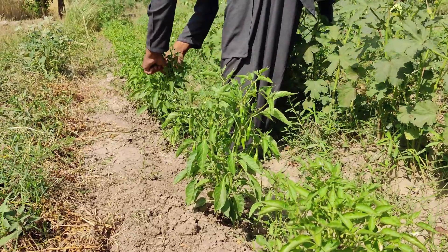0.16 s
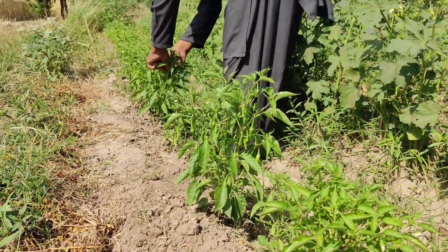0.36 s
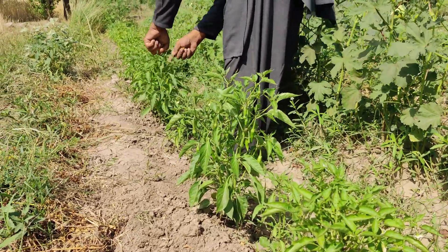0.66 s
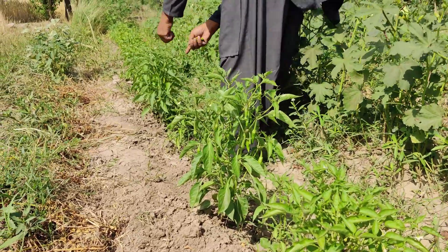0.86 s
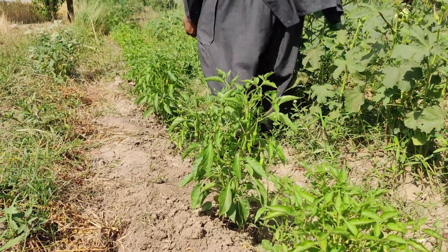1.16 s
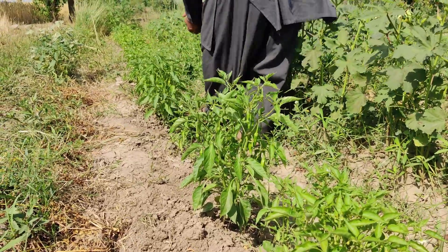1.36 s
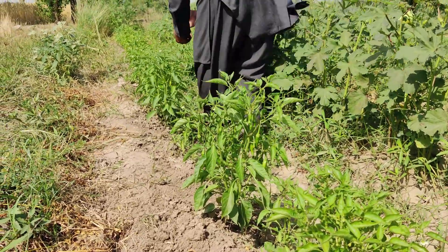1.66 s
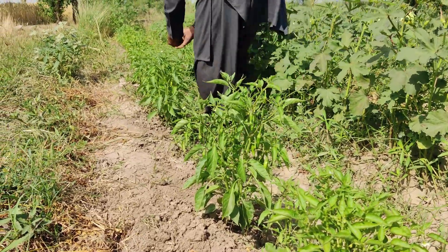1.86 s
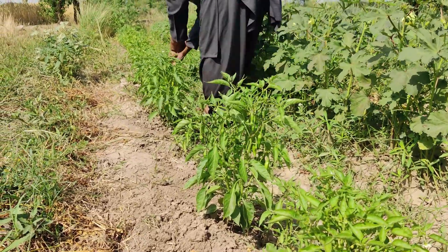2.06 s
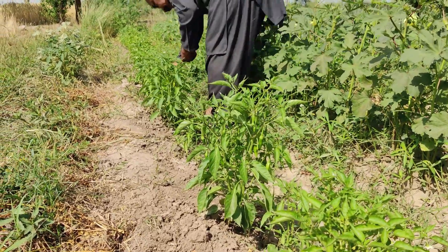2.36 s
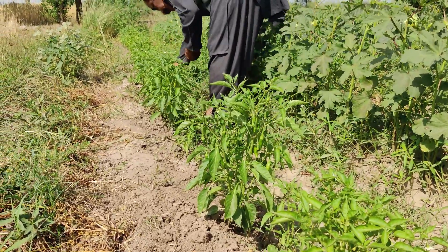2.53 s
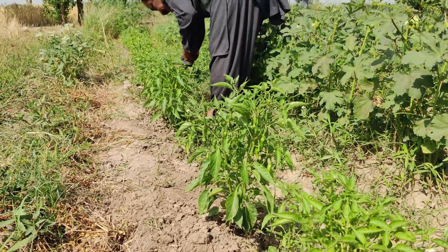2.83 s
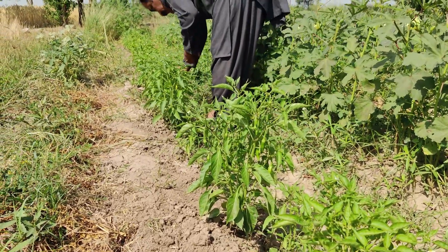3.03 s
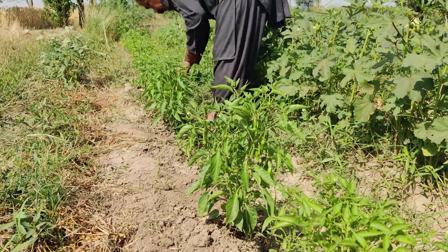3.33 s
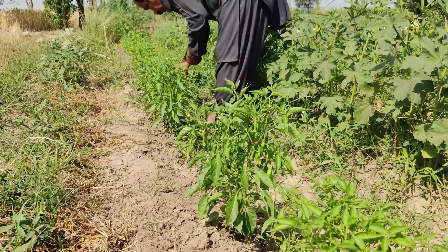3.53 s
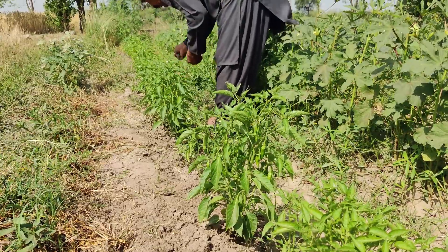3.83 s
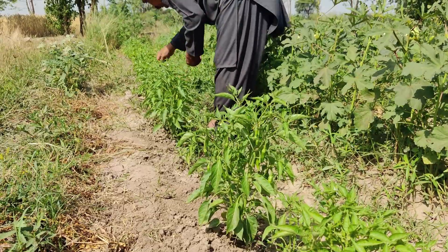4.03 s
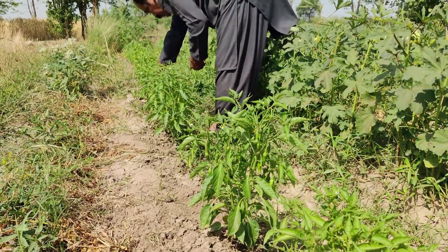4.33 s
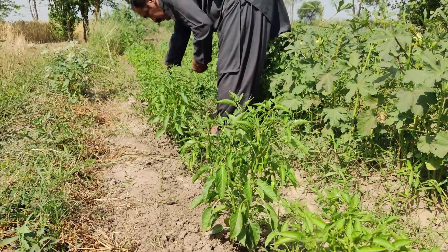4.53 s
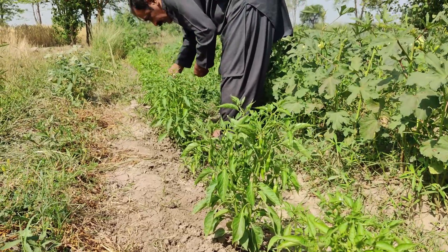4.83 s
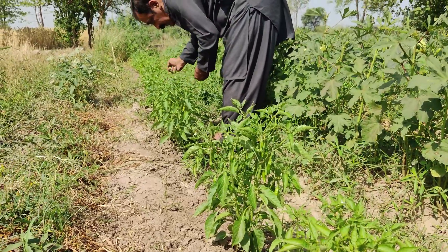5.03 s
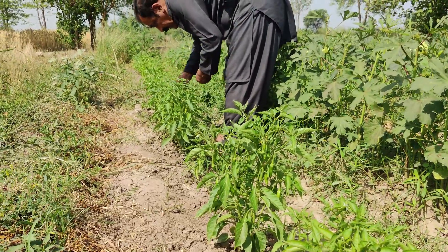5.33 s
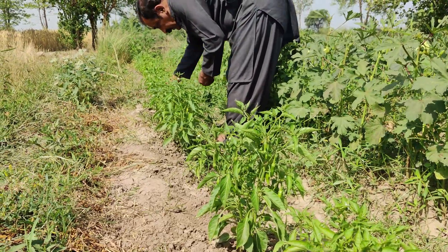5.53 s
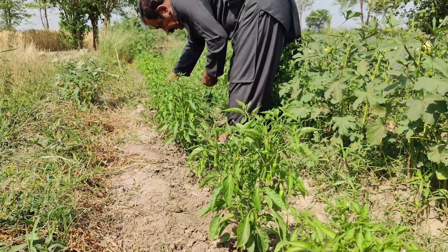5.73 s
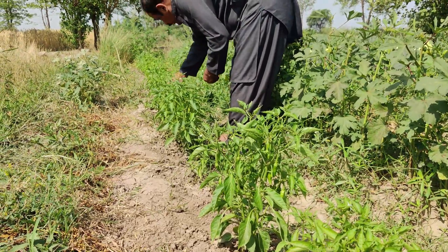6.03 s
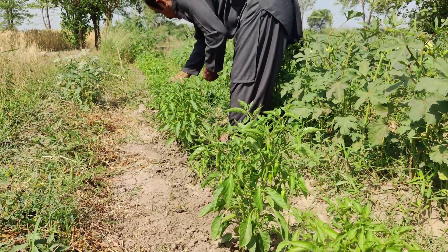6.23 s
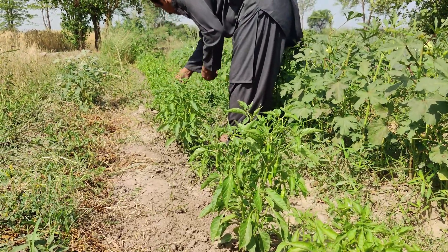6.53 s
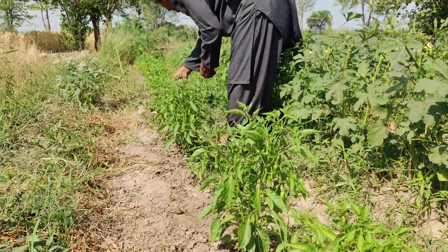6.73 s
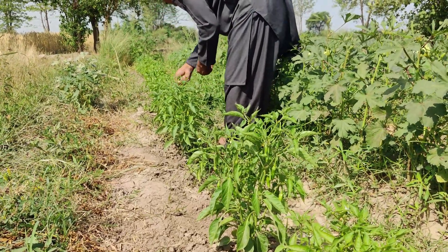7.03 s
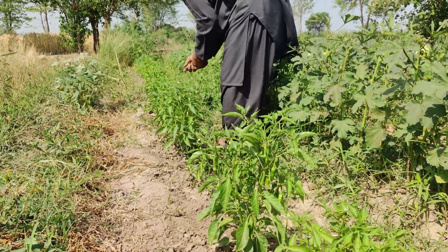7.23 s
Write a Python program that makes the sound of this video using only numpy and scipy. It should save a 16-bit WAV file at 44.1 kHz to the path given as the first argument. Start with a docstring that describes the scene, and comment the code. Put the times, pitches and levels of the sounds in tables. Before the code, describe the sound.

Wind rumbles and thumps on the microphone in a vegetable field while leaves rustle, stems snap, a small bird repeats its phrase and crows caw.

```python
"""First comes wind rumbling on a two-port microphone among vegetables, with a crow's caw and a hiss of leaves.
Close by, eddies thump the ports, leaves rustle, stems snap and dry soil knocks: shaped noise and ringing modes.
Farther off, a warbler repeats one four-note phrase, crows caw and birds chirp and trill: gliding tones with echoes.
Behind them lie a far engine's two wavering tones and the filtered noise of open land.
The level dips at a steady rate five times; four times it returns quickly, three of these with a puff of noise."""
import sys
import numpy as np
from scipy import signal
from scipy.fft import rfft, irfft, next_fast_len
from scipy.io import wavfile
from scipy.ndimage import uniform_filter1d, map_coordinates

SR = 44100
rng = np.random.default_rng(int(sys.argv[2]) if len(sys.argv) > 2 else 0)


def transcribe(u):
    """Save the signal u as a 16-bit wav file named by the first command-line argument.

    u: samples, shape (n,) or (channels, n), limited to [-1, 1]; the rate is SR.
    q: integer samples, one column per channel.
    """
    v = np.clip(np.atleast_2d(u).T, -1, 1)
    q = np.round(v * 32767).astype(np.int16)
    wavfile.write(sys.argv[1], SR, q)


N = 325458


def amp(db):
    """Decibels to gain."""
    return 10 ** (np.asarray(db) / 20)


def unit(x):
    """Scale to rms 1."""
    return x / np.sqrt(np.mean(x ** 2) + 1e-20)


def along(points, hz):
    """Read (f/Hz, value) points on a log frequency axis."""
    f, v = np.transpose(points)
    return np.interp(np.log(hz + 1e-6), np.log(f), v)


def curves(rows):
    """Each column after the time, read at every sample."""
    s, *cols = np.transpose(rows)
    return [np.interp(np.arange(N) / SR, s, c) for c in cols]


def wobble(rate, size=N):
    """A smooth random curve with this rate of knots per second."""
    knots = rng.standard_normal(int(size * rate / SR) + 4)
    return map_coordinates(knots, [np.arange(size) * rate / SR])


def whistle(hz):
    """A sine that follows a changing pitch."""
    return np.sin(2 * np.pi * np.cumsum(hz) / SR)


def filtered(x, response):
    """Multiply the spectrum of x by a response of frequency."""
    m = next_fast_len(N + 8192)
    return irfft(rfft(x, m) * response(np.fft.rfftfreq(m, 1 / SR)), m)[..., :N]


def add(track, s, sound):
    """Mix a sound into the track at s seconds."""
    i = max(0, round(s * SR))
    part = track[..., i:i + sound.shape[-1]]
    part += sound[..., :part.shape[-1]]


def pan(db):
    """Left and right gains, this many dB apart, of mean power 1."""
    g = amp(np.array([db, -db]).reshape(2, -1) / 2)
    return g / np.sqrt(np.mean(g ** 2, axis=0))


def rush(spectrum, alike, patchy_db):
    """Stereo noise of rms 1, patchy in time and pitch; mid and side shares set how alike the ports are."""
    z = signal.stft(rng.standard_normal((2, N)), nperseg=512)[2]
    patches = uniform_filter1d(rng.standard_normal(z.shape[1:]), size=6, axis=0)
    patches = uniform_filter1d(patches, size=14, axis=1)
    pair = signal.istft(z * amp(patchy_db * unit(patches)), nperseg=512)[1][:, :N]

    def response(hz):
        turn = np.arccos(np.clip(along(alike, hz), -1, 1)) / 2
        return amp(along(spectrum, hz)) * [np.cos(turn), np.sin(turn)]

    mid, side = filtered(pair, response)
    return unit(np.array([mid + side, mid - side]))


def even(x, seconds):
    """Take the slow swells out of a noise, leaving its fast lumps."""
    power = uniform_filter1d(np.mean(x ** 2, axis=0), int(seconds * SR) + 1)
    return x / np.sqrt(np.abs(power) + 1e-4)


def outdoors(x, lag_ms, wet_db, t60, echo_s, echo_db):
    """A far source: it reaches the right port first, scatters in the plants and echoes off the trees."""
    t = np.arange(SR // 2) / SR
    shapes = [amp(-60 * t / t60), np.exp(-((t - echo_s) / 0.0074) ** 2)]
    scatter, echo = [unit(e * rng.standard_normal((2, len(t)))) / np.sqrt(len(t)) for e in shapes]
    tail = amp(wet_db) * scatter + amp(echo_db) * echo
    lag_s = lag_ms / 1000 * np.array([[-1], [1]])  # half of it acts on each port, in opposite directions
    direct = filtered(x, lambda hz: np.exp(1j * np.pi * hz * lag_s))
    return direct + signal.fftconvolve(x[None], tail, axes=1)[:, :N]


# Wind over both ports, at the microphone: (t/s, level/dB)
WIND_STRENGTH = [(0, -50.5), (.2, -48.5), (.66, -54.5), (.74, -51), (1.1, -54), (1.28, -51), (1.35, -64.5),
                 (1.67, -53), (1.85, -60.5), (2.33, -56), (2.68, -57.5), (2.86, -46.5), (3.45, -55),
                 (3.8, -50), (4.53, -54.5), (4.67, -50), (4.88, -54), (5.12, -49), (5.6, -49.5),
                 (6.05, -49.5), (6.4, -52), (6.62, -49), (7.15, -52), (7.22, -58), (7.35, -45.5)]
# Spectrum of the low rumble at the ports: (f/Hz, relative level/dB per Hz)
RUMBLE_SPECTRUM = [(10, -13.5), (22, -2), (36, -3), (47, -0.5), (56, 0), (70, -10), (100, -17),
                   (140, -27.5), (250, -53), (500, -81)]
# Spectrum of the faster flutter, in wind and eddies alike: (f/Hz, relative level/dB per Hz)
FLUTTER_SPECTRUM = [(50, -22), (78, 4), (100, 5.5), (125, 0), (160, -3.5), (195, -3), (260, -16),
                    (400, -35), (900, -72), (3000, -60), (8000, -84)]


def wind(swirl_db=1.7, side_db=1, mean_flutter_db=-67, flutter_growth=.5):
    """Steady flow rumbles on both ports nearly alike, with small swirls on each and a faster flutter on top."""
    strength_db, = curves(WIND_STRENGTH)
    rumble = even(rush(RUMBLE_SPECTRUM, [(25, 0.3), (52, 1.0), (120, 0.6)], patchy_db=2.5), seconds=0.051)
    flutter = rush(FLUTTER_SPECTRUM, [(150, 0.99)], patchy_db=4) * amp(2.8 * wobble(40))
    flutter = even(flutter, seconds=.07)
    swirls = swirl_db * np.array([wobble(16), wobble(18)])
    # flutter_growth: flutter dB for each dB of wind
    flutter_db = mean_flutter_db + flutter_growth * (strength_db - strength_db.mean())
    return pan(side_db) * (amp(strength_db + swirls) * rumble + amp(flutter_db) * flutter)


# Strongest eddies at the ports: (t/s, thump level/dB, flutter level/dB, left over right level/dB)
EDDY_HITS = [(.11, -44, -82, 15), (0.219, -40.5, -72, -31), (0.282, -43.5, -77, -23),
             (2.964, -30.5, -39, 40), (3.037, -35.5, -37.5, 22), (3.079, -38.5, -60, 24),
             (3.182, -41.5, -55.5, 28), (3.281, -45, -51.5, -11), (3.631, -43.5, -72, 25),
             (3.733, -44, -66, -9), (3.968, -42.5, -75, -10), (4.22, -41, -75, 14), (4.278, -42, -82, 5),
             (4.648, -47.5, -60.5, -1), (5.077, -46.5, -62, 34), (5.137, -36, -44, 43),
             (5.198, -35.5, -54.5, 30), (5.292, -33.5, -55.5, 20), (5.348, -34.5, -57, 38),
             (5.403, -40, -56.5, 14), (5.801, -48, -63, 38), (5.976, -37, -64, 9), (6.16, -42, -61, 7),
             (6.241, -41.5, -66, 10), (6.448, -45.5, -75, 20), (6.625, -43, -82, 7)]
# Spectrum of an eddy's thump: (f/Hz, relative level/dB per Hz)
THUMP_SPECTRUM = [(10, 0.5), (25, 5.5), (50, 4), (75, -4), (105, -11), (150, -25), (300, -50), (3000, -70)]


def eddies(width_s=0.015):
    """Each eddy shoves the ports unequally to and fro for a moment; the strong ones flutter."""
    track, t = np.zeros((2, N)), np.arange(-SR // 16, SR // 16) / SR
    swell = np.exp(-(t / width_s) ** 2 / 2)

    def coloured(spectrum):
        return filtered(rng.standard_normal(N), lambda hz: amp(along(spectrum, hz)))

    def burst(noise, s):
        return unit(noise[round(s * SR):][:len(t)] * swell) * np.sqrt(np.mean(swell ** 2))

    thump, flutter = coloured(THUMP_SPECTRUM), coloured(FLUTTER_SPECTRUM)
    for s, thump_db, flutter_db, side_db in EDDY_HITS:
        hit = amp(thump_db) * burst(thump, s) + amp(flutter_db) * burst(flutter, s)
        add(track, s + t[0], pan(side_db) * hit)
    return track


# Puffs as the sunken sound returns: (t/s, puff level/dB)
RETURN_PUFFS = [(1.647, -68), (2.758, -73.5), (5.06, -63)]
# Spectrum of a puff: (f/Hz, relative level/dB per Hz)
PUFF_SPECTRUM = [(40, 2), (150, 8.5), (400, -7), (1200, -17), (6000, -12), (8000, -21), (15000, -39)]
# Likeness of the two ports for broad noises, from rustle to far land: (f/Hz, likeness 0-1)
PORT_LIKENESS = [(250, 0.72), (640, 0.11), (1400, 0), (7000, 0)]


def return_puffs(t60=0.19, shove_db=14, shove_s=0.0038):
    """Puffs as the sunken sound returns: one low shove and a sudden broad noise that dies away."""
    swell, shove, t = np.zeros(N), np.zeros(N), np.arange(SR // 2) / SR
    u = t / shove_s
    for s, db in RETURN_PUFFS:
        add(swell, s, amp(db - 60 * t / t60))
        add(shove, s, -amp(db + shove_db) * u * (2 - u / 2) * np.exp(1 - u))  # swings back past zero
    return swell * rush(PUFF_SPECTRUM, PORT_LIKENESS, patchy_db=1) + shove


# Leaves brushed close by, by hands and cloth: (t/s, decay length/s, level/dB before the rise and decay)
LEAF_BRUSHES = [(0.122, 0.19, -71.5), (0.463, 0.088, -67), (0.688, 0.25, -72.5), (1.038, 0.13, -68),
                (1.28, 0.044, -65.5), (1.515, 0.053, -56), (1.615, 0.16, -66), (1.91, 0.027, -71),
                (2.0, 0.15, -76.5), (4.19, 0.14, -72.5), (4.637, 0.19, -76.5), (5.78, 0.8, -82.5)]
# Spectrum of the fine rustle: (f/Hz, relative level/dB per Hz)
RUSTLE_SPECTRUM = [(800, -6), (2500, 0), (4500, 0.5), (6500, 1), (7800, -8.5), (10000, -2.5), (12000, -2),
                   (14200, 0.5), (15600, -6)]


def rustle(attack_s=0.025, stir_db=-78.5, ticks_per_s=220):
    """Leaves brush cloth and each other: a flickering hiss, dry ticks, and a fast rise and slow fall a brush."""
    t = np.arange(N) / SR
    power = np.full(N, amp(stir_db) ** 2)  # leaves that never stop stirring
    for s, length, db in LEAF_BRUSHES:
        brush = amp(db) * np.minimum(1, t / attack_s) * np.exp(-(t / length) ** 2 / 2)
        add(power, s, brush ** 2)
    ticks = (rng.random(N) < ticks_per_s / SR) * rng.standard_normal((2, N))
    ticks = unit(filtered(ticks, lambda hz: amp(along(RUSTLE_SPECTRUM, hz))))
    hiss = rush(RUSTLE_SPECTRUM, PORT_LIKENESS, patchy_db=2.3)
    return np.sqrt(power) * amp(1.75 * wobble(35)) * (hiss + amp(-9) * ticks)


# Stems and twigs breaking close by: (t/s, level/dB, f/Hz, tearing time/s, ringing share 0-1,
# left over right level/dB)
STEM_SNAPS = [(.7038, -31.5, 3680, .0017, .76, -4), (3.517, -45, 3480, .0006, .75, -6),
              (3.5238, -58, 3400, .0007, .8, -8), (3.527, -54, 3330, .0007, .8, -11),
              (4.8202, -52, 4700, .0004, .1, -8), (4.89, -54, 2075, .0006, .3, -14),
              (6.8218, -51.5, 2920, .0014, .45, -2), (1.55, -65.5, 4270, .002, .2, -5),
              (1.671, -57, 6000, .002, .1, -10), (1.7485, -54, 4600, .002, .1, -8),
              (2.144, -65, 1900, .0012, .1, -4), (4.188, -61, 3200, .002, .2, -2.5)]
# Noise of tearing fibres: (ratio to the stem's f, relative level/dB)
FIBRE_SPECTRUM = [(.1, -13), (.3, -9), (.55, -1), (.8, 2), (1, 4), (1.3, 1), (1.75, -3), (2.25, -13),
                  (3.2, -7), (4.2, -10), (6, -24)]
# Modes a stem rings with: (ratio to the stem's f, level/dB)
RINGING_MODES = [(.52, -20), (.78, -13), (1, 0), (1.17, -10), (1.93, -9), (3.2, -23)]
# Spectrum of leaf hiss, in shaken leaves and the whole crop: (f/Hz, relative level/dB per Hz)
LEAF_SPECTRUM = [(600, -22.5), (1400, -5), (2300, -1), (3000, -2.5), (3700, 0), (4700, 5.5), (5600, 1),
                 (6600, 2.5), (7300, -10), (8200, -14), (15000, -12)]


def snaps(t60=.0055, leaves_db=-27, leaves_t60=.1, first_db=-3, split_size=.35):
    """A stem rings ever harder while its fibres tear, parts with a bright tick, and its leaves shake."""
    track, t = np.zeros((2, N)), np.arange(-SR // 64, SR // 8) / SR
    hz_axis = np.fft.rfftfreq(2 * len(t), 1 / SR)

    def noise(colour_db):
        white = rng.standard_normal((2, 2 * len(t)))
        return unit(irfft(rfft(white) * amp(colour_db))[:, :len(t)])

    shaking = (t > 0) * amp(leaves_db - 60 * t / leaves_t60)
    for s, db, hz, tear_s, ring, side_db in STEM_SNAPS:
        tearing_db = np.interp(t, [0, tear_s], [first_db, 0]) - 60 * np.maximum(0, t - tear_s) / t60
        tearing = (t > 0) * amp(tearing_db)
        phase = 2 * np.pi * hz * t + np.array([[1.2], [0]])
        modes = sum(amp(mode_db) * np.sin(ratio * phase) for ratio, mode_db in RINGING_MODES)
        body = ring * modes + (1 - ring) * noise(along(FIBRE_SPECTRUM, hz_axis / hz))
        split = np.exp(-np.abs(t - tear_s) * SR)
        crack = tearing * body + split_size * split + shaking * noise(along(LEAF_SPECTRUM, hz_axis))
        add(track, s + t[0], amp(db) * pan(side_db) * crack)
    return track


# Dull knocks on dry soil, close by: (t/s, level/dB before the rise and decay, f/Hz)
SOIL_KNOCKS = [(.452, -46.5, 500), (1.7478, -52.5, 597), (2.1427, -59, 900)]


def knocks(t60=0.005, attack_s=0.00019):
    """Soil hardly rings: each knock is a few quickly dying low swings."""
    track, t = np.zeros(N), np.arange(SR // 16) / SR
    for s, db, hz in SOIL_KNOCKS:
        envelope = amp(db - 60 * t / t60) * (1 - np.exp(-t / attack_s))
        add(track, s, envelope * np.sin(2 * np.pi * hz * t))
    return track


# Slurred notes of the warbler, as centres of a random scatter: (t/s into the phrase, length/s,
# share before the turn, start f/Hz, turn f/Hz, end f/Hz, level/dB, share of the accent)
PHRASE_NOTES = [(.008, .02, .6, 5150, 4880, 4500, -4, .95), (.032, .025, .7, 6580, 6720, 5600, 0, 1),
                (.064, .033, .72, 4400, 4470, 4200, -5, 0), (.094, .032, .45, 4600, 4270, 4180, .5, .1)]


def phrase(accent_db, scatter_db=1):
    """Four whistled slurs, never quite alike: each swells to its turning pitch, then flicks away."""
    track = np.zeros(SR // 4)
    for s, length, turn, start_hz, turn_hz, end_hz, db, accent in PHRASE_NOTES:
        t = np.arange(0, length, 1 / SR)
        turn = np.clip(turn + .08 * rng.standard_normal(), .2, .9)
        marks = [0, turn * length, length]
        detune = 1 + np.array([.02, .006, .015]) * rng.standard_normal(3)
        hz = np.interp(t, marks, np.array([start_hz, turn_hz, end_hz]) * detune)
        hz = hz * (1 + .016 * wobble(200, len(t)))
        swell = np.sin(np.pi / 2 * np.interp(t, marks, [0, 1, 0]))
        level_db = db + accent * accent_db + scatter_db * rng.standard_normal()
        level_db = level_db + 2.3 * wobble(170, len(t))
        add(track, s, amp(level_db) * swell * whistle(hz))
    return track


# The warbler's phrases, mostly about .29 s apart: (t/s, level/dB, accent on the high notes/dB)
WARBLER_PHRASES = [(0.116, -69, -6), (.942, -69, 3.5), (1.235, -72.5, 9), (1.751, -64, 5), (2.039, -75, 4),
                   (2.331, -69, 4.5), (2.622, -58.5, -1.5), (2.913, -60.5, -4), (3.205, -65.5, 2),
                   (3.498, -62, -3), (3.787, -61, -7), (4.078, -55, -7.5), (4.368, -65, 5),
                   (4.666, -67.5, 4.5), (4.957, -62.5, -2.5), (5.249, -56.5, -2), (5.548, -63, 2.5),
                   (5.841, -67, 4), (6.137, -55.5, -3.5), (6.431, -62.5, 1), (6.728, -61.5, -5.5),
                   (7.017, -61, 2.5)]


def warbler(hedge_s=.015, hedge_db=-11):
    """One quick phrase over and over, louder and softer as the bird turns; the nearest plants double each note."""
    track = np.zeros(N)
    for s, db, accent_db in WARBLER_PHRASES:
        song = amp(db) * phrase(accent_db)
        add(track, s, song)
        add(track, s + hedge_s * (1 + .25 * rng.standard_normal()), amp(hedge_db) * song)
    return outdoors(track, lag_ms=.2, wet_db=-4, t60=.45, echo_s=.0965, echo_db=-9)


# Distant crow caws: (t/s, length/s, level at the ends/dB, throat resonance f/Hz, pitch at the top f/Hz,
# share the pitch falls, hoarseness 0-1, swell of the middle over the ends/dB)
CROW_CAWS = [(0, .11, -69.5, 1610, 398.5, 0.17, .75, -0.5), (1.713, 0.14, -82, 1750, 426, -0.0022, 0.83, 0),
             (1.9, 0.22, -81.5, 1690, 425, 0, 0.84, 7.5), (2.388, 0.27, -83, 1710, 422, 0.0085, .8, 6),
             (2.908, .232, -76, 1556, 382, 0, .85, 6), (4.61, .178, -76.5, 1740, 420, .09, .42, 11),
             (6.142, 0.23, -70, 1575, 375.7, -.06, .85, 6.5)]
# Throat resonance: (ratio to its f, level/dB)
THROAT_RESONANCE = [(.3, -37), (.45, -21), (.6, -19), (.76, -16), (.88, -5), (1, 0), (1.09, -1.5),
                    (1.17, -11), (1.32, -24), (1.5, -18), (1.8, -23), (3, -62)]


def crows(rattle_hz=63, depth=.65, skid=.07, burr=.01, rough=.85, between=.75,
          arch_share=.2, beak_lift=.015, attack_s=.0062, release_s=.021):
    """Arching harmonics under a throat resonance; hoarse caws break into smeared pulses that slide in pitch."""
    track = np.zeros(N)
    for s, length, db, throat_hz, pitch_hz, fall, hoarse, swell_db in CROW_CAWS:
        t = np.arange(0, length, 1 / SR)
        arch, sag = np.sin(np.pi * t / length), fall * (.5 - t / length)
        cycle = np.cumsum(rattle_hz * (1 + .08 * wobble(40, len(t)))) / SR % 1
        pulses = 1 - depth * hoarse * np.cos(np.pi * cycle) ** 2
        droop = arch_share * (1 - hoarse / 2) * (1 - arch)  # lower pitch at both ends
        slide = skid * hoarse * np.sin(2 * np.pi * cycle) / 2
        hz = pitch_hz * (1 - droop + sag + slide + burr * wobble(151.3, len(t)))
        phase = 2 * np.pi * np.cumsum(hz) / SR
        # the resonance rises as the beak opens
        open_hz = throat_hz * (1 + beak_lift * (arch - arch.mean()) + sag / 2)

        def line(k):
            smear = rough * hoarse * wobble(219, len(t))
            return amp(along(THROAT_RESONANCE, k * hz / open_hz)) * np.sin(k * phase + smear)

        # hoarseness adds lines between the harmonics
        voice = sum(line(k) + between * hoarse * line(k + .5) for k in range(1, 10))
        gate = np.minimum(1, np.minimum(t / attack_s, (length - t) / release_s))
        add(track, s, amp(db + swell_db * arch) * gate * unit(voice * pulses))
    return outdoors(track, lag_ms=.07, wet_db=-5.5, t60=.14, echo_s=.048, echo_db=-17)


# Short falling chirps; the first is a small falling note that ends the crow's first caw: (t/s, length/s, peak
# level/dB, middle f/Hz)
FALLING_CHIRPS = [(0.102, 0.052, -74.5, 1720), (4.086, 0.06, -65.5, 2007), (4.225, 0.032, -64.5, 2085),
                  (4.681, 0.018, -69, 2460), (5.912, 0.057, -64, 2060), (6.035, 0.039, -66, 2040),
                  (6.06, 0.088, -69.5, 2883), (6.095, 0.025, -67, 2084), (7.305, 0.057, -63.5, 2047)]
# Arched, burry whistles: (t/s, length/s, peak level/dB, reference f/Hz; the arch tops at .98 of it)
BURRY_TRILLS = [(5.554, 0.1, -76.5, 1630), (6.554, 0.26, -74, 1816)]


def chirper(burr_hz=72, burr=0.034, waver=0.024, fall=0.092):
    """Soft falling notes, the first of them closing the crow's first caw, and other birds' arched whistles with
    a fast burr in their pitch."""
    track = np.zeros(N)
    for s, length, db, hz in FALLING_CHIRPS:
        t = np.arange(0, length, 1 / SR)
        glide = 1 + fall * (.5 - t / length) + waver * wobble(320, len(t))
        add(track, s, amp(db) * np.sin(np.pi * t / length) ** 2 * whistle(hz * glide))
    for s, length, db, hz in BURRY_TRILLS:
        t = np.arange(0, length, 1 / SR)
        arch = np.sin(np.pi * t / length)
        glide = .87 + 0.11 * arch + burr * np.sin(2 * np.pi * burr_hz * t) + 0.03 * wobble(503.0, len(t))
        add(track, s, amp(db) * arch ** 1.3 * whistle(hz * glide))
    return pan(3.5) * outdoors(track, lag_ms=.04, wet_db=-6, t60=.25, echo_s=.03, echo_db=-11)


# Background at the microphone: (t/s, far land level/dB, leaf hiss level/dB, far engine level/dB)
FIELD_LEVELS = [(0, -74, -72.5, -82), (.85, -75, -72, -83), (1.4, -77.5, -73.5, -101),
                (1.8, -80, -75.5, -87), (2.4, -78, -74, -91), (3.3, -76.5, -72.5, -84.5),
                (4.3, -73.5, -69.5, -85), (4.9, -76.5, -72.5, -87), (5.3, -73.5, -70, -78.5),
                (6.15, -70.5, -70, -75.5), (6.75, -72, -71, -77), (7.35, -73, -74, -82)]
# The engine's higher whine: (t/s, level/dB)
WHINE_LEVEL = [(4.8, -108), (6.0, -92), (6.7, -79), (7.0, -89.5), (7.35, -81)]


def engine(start_hz=370, end_hz=383, whine_hz=722):
    """A far engine's hum wavers on the wind; a higher whine joins it late."""
    *_, level_db = curves(FIELD_LEVELS)
    whine_db, = curves(WHINE_LEVEL)

    def tone(hz):
        waver = 1 + .005 * wobble(25) + .008 * wobble(4)
        return whistle(hz * waver) * amp(2.5 * wobble(7))

    return amp(level_db) * tone(np.linspace(start_hz, end_hz, N)) + amp(whine_db) * tone(whine_hz)


# Spectrum of the far open land: (f/Hz, relative level/dB per Hz)
LAND_SPECTRUM = [(120, -10.5), (250, 5), (420, 1), (700, -1), (1000, -6.5), (1800, -9), (3000, -13),
                 (7000, -27)]


def background():
    """The low wash of open land and the even hiss of the crop, both shaped noise."""
    land_db, hiss_db, _ = curves(FIELD_LEVELS)
    land = amp(land_db) * rush(LAND_SPECTRUM, PORT_LIKENESS, patchy_db=2.5)
    hiss_gain = amp(hiss_db + 0.26 * wobble(9))
    return land + hiss_gain * rush(LEAF_SPECTRUM, PORT_LIKENESS, patchy_db=1.8)


# Dips in the level of field and wind: (start t/s, end t/s, sinking rate/dB per s, return time/s)
DIP_TIMES = [(0.847, 1.646, 14, 0.0057), (2.081, 2.754, 26, 0.094), (4.922, 5.051, 50, 0.0094),
             (5.495, 5.774, 22, 0.026), (6.801, 7.394, 19.5, 0.0088)]


def level_dips():
    """The level dips: it fades at a steady rate in each dip, then returns quickly."""
    t = np.arange(N) / SR
    return amp(sum(np.interp(t, [start, end, end + back], [0, -rate * (end - start), 0])
                   for start, end, rate, back in DIP_TIMES))


# Balance of the microphone's ports for the field: (f/Hz, left over right level/dB)
PORT_BALANCE = [(500, 0.5), (1300, 0.5), (2400, 3), (4300, -7), (5500, -12.5), (7500, -4), (14000, -1)]


def scene(rustle_sinks=1.58):
    """Field and wind share the level dips; the right port hears the field's treble more brightly."""
    gain = level_dips()
    field = gain * (background() + warbler() + crows() + chirper() + engine())
    # the fine rustle sinks rustle_sinks dB for each dB of a dip
    field = field + gain ** rustle_sinks * rustle() + return_puffs()
    field = filtered(field, lambda hz: pan(along(PORT_BALANCE, hz)))
    return field + snaps() + knocks() + gain * wind() + eddies()


def record(dry, top_hz=15600):
    """The microphone's output stops sharply at its upper band limit."""
    return filtered(dry, lambda hz: hz < top_hz)


dry = scene()
out = record(dry)
transcribe(out)
```